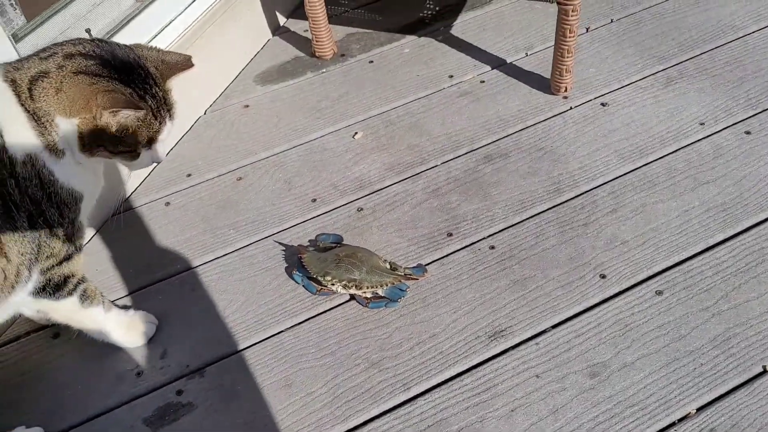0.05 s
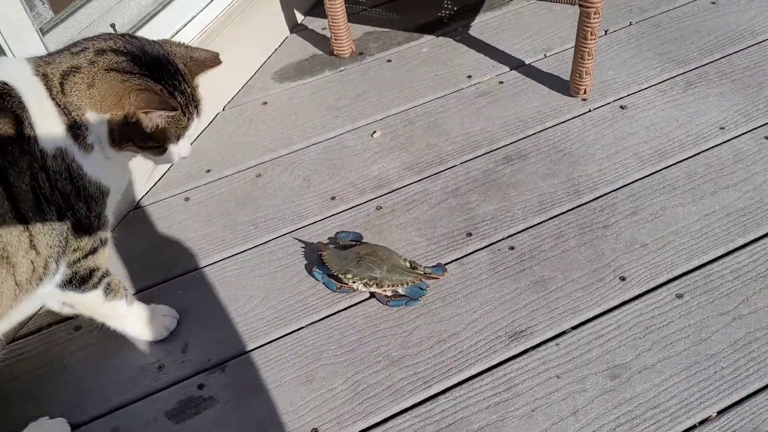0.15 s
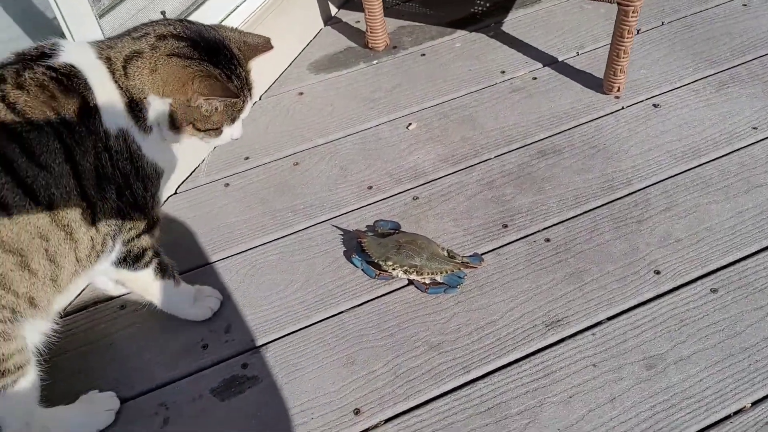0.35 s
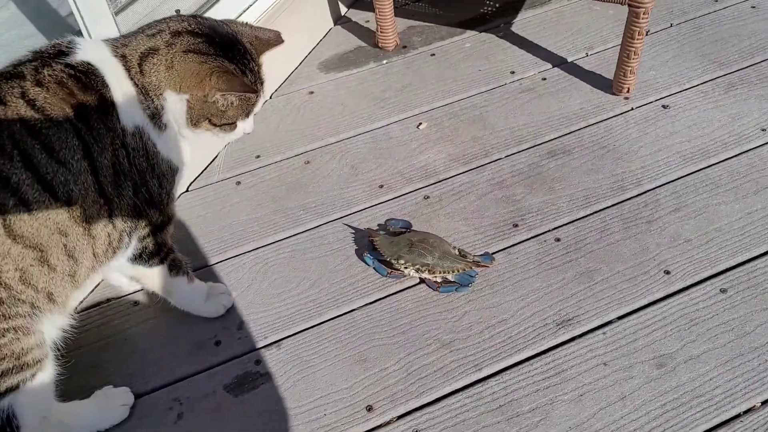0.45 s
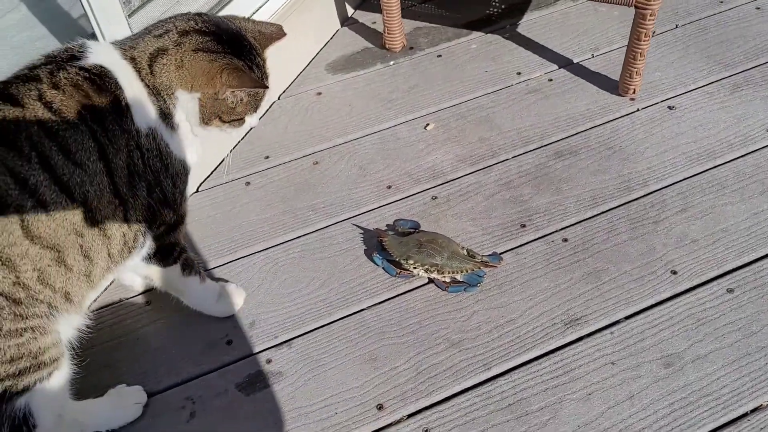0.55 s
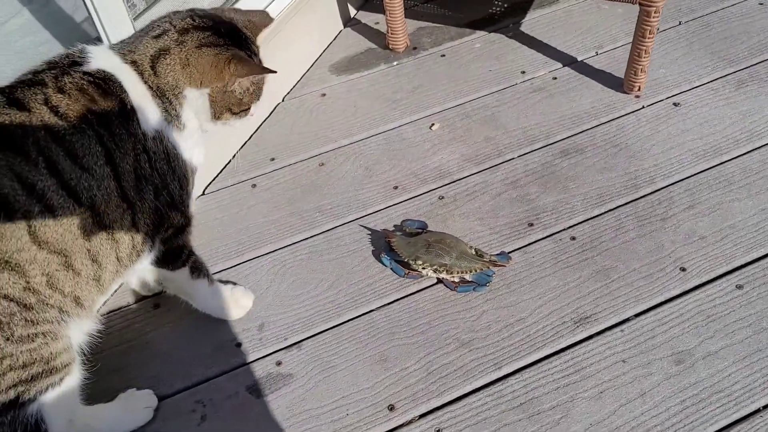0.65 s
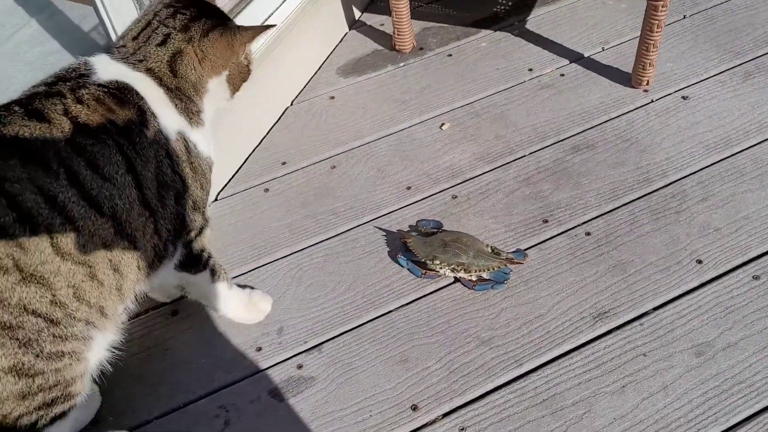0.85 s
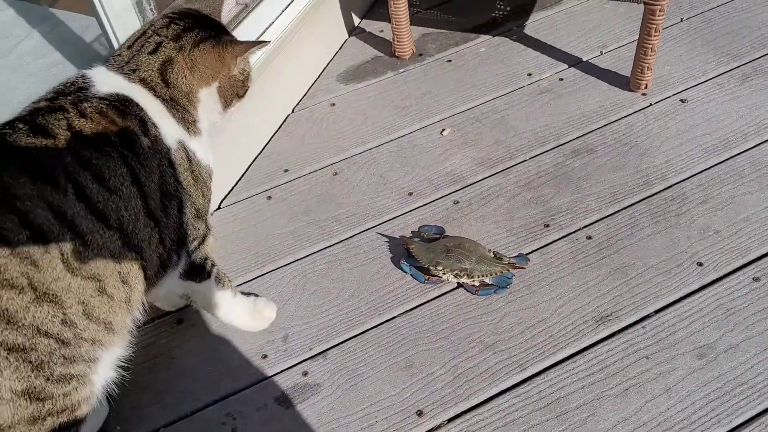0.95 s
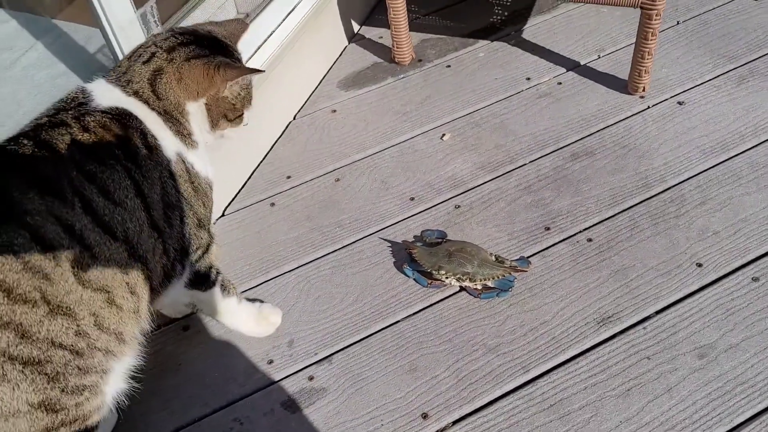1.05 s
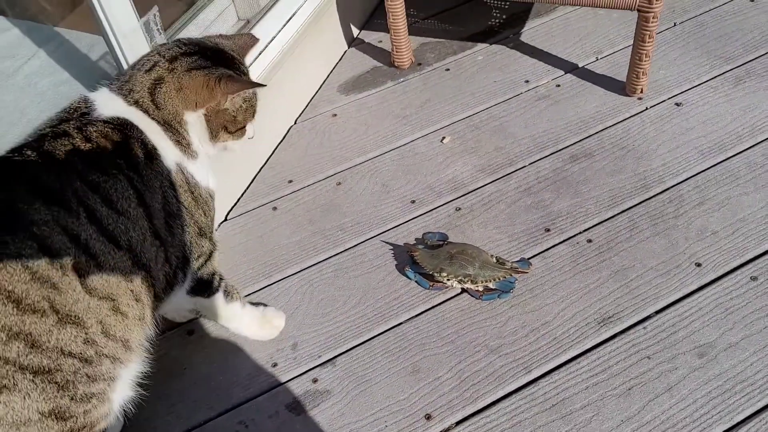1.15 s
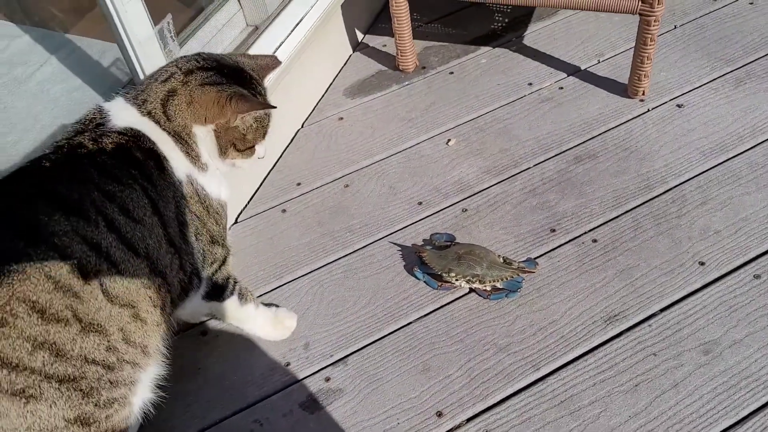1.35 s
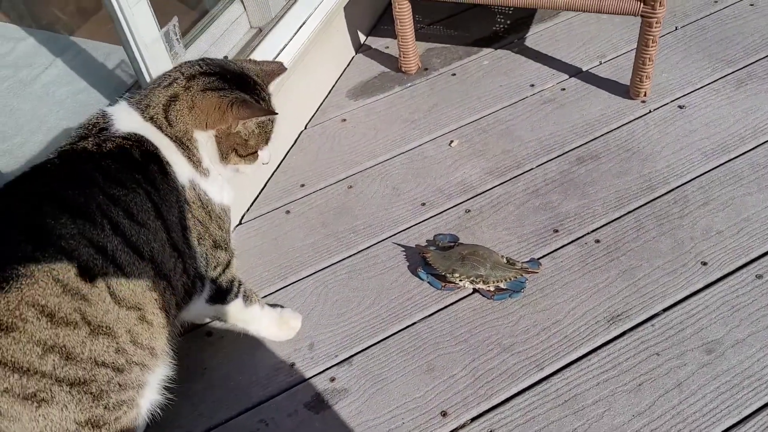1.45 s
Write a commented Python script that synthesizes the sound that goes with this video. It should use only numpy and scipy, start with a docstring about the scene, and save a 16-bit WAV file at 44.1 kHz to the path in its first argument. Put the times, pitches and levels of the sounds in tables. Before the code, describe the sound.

A sharp tap on a wooden deck, then a cat's faint steps and paw scuffs.

```python
"""One sharp tap knocks a board as a cat steps about on a wooden deck, close by.
A light scratch and a few soft taps follow. Each impact excites the damped modes of the board
and shakes the deck; sliding paws and catching claws make friction noise. A house wall
reflects each sound at once. Behind it lie a low outdoor rumble and a faint, even hiss."""
import sys
import numpy as np
from scipy import signal
from scipy.fft import rfft, irfft
from scipy.io import wavfile

SR = 44100
rng = np.random.default_rng(int(sys.argv[2]) if len(sys.argv) > 2 else 0)


def store_pcm(level_fs):
    """Save levels as 16-bit WAV."""
    pcm = np.round(np.clip(level_fs, -1, 1) * 32767).astype(np.int16)
    wavfile.write(sys.argv[1], SR, np.atleast_2d(pcm).T)


N = 66150
T = np.arange(N) / SR
FREQS = np.maximum(np.arange(N // 2 + 1) * SR / N, 1)

# Coherence of the scuffs and the outdoor noise. Each row: frequency in Hz, left-right correlation.
COHERENCE = [(60, 0.9), (300, 0.85), (650, 0.66), (1400, 0.014), (3000, 0.089), (14000, -0.11)]


def taps():
    """Impact excitation: each step knocks the board, rings the struck spot, clicks and shakes the deck."""
    # Each row: start in seconds, knock gain in dB, its cut-off in Hz, click gain in dB, its cut-off
    # in Hz, shudder gain in dB, frequency of the struck spot in Hz, its level in dB.
    steps = [(0.2186, 2, 2940, 2.5, 15800, 0, 1794, -42), (0.3751, -17.5, 417, -22.5, 14100, -14, 380, -53),
             (0.4355, -34, 500, -34, 4000, -19.5, 660, -50.5),
             (0.4718, -17, 644, -15, 3470, -10.5, 1110, -50), (0.655, -39, 350, -35, 3000, -23.5, 280, -65)]
    out = np.zeros((2, N))
    for start, knock_db, soft_hz, click_db, click_hz, shudder_db, spot_hz, spot_db in steps:
        age = T - start
        out += undb(knock_db) * board_knock(age, soft_hz)
        out += undb(spot_db) * mode(age, spot_hz, rise=0.003, t60=0.048)
        out += undb(click_db) * contact_click(age, click_hz)
        out += undb(shudder_db) * deck_shudder(age)
    return out


def board_knock(age, soft_hz):
    """Modal vibration: the board rings in its low modes; a softer contact passes less treble."""
    # Each row: frequency in Hz, level in dB, 60 dB decay time in seconds.
    low_modes = [(284.2, -43, .22), (327, -29.5, 0.042), (436.3, -44.5, 0.11), (472, -35, 0.057),
                 (617, -30.5, 0.042), (664, -32, 0.028), (745, -28.5, 0.04)]
    knock = sum(undb(db) * mode(age, hz, rise=0.00256, t60=t60) for hz, db, t60 in low_modes)
    knock = lowpass(knock, hz=836, order=6)
    knock = highpass(knock, hz=212, order=3)
    return lowpass(knock, soft_hz)


def contact_click(age, cutoff_hz):
    """Broadband excitation: a hard contact gives a burst of noise and wakes the board's high modes."""
    # Each row: frequency in Hz, level in dB, 60 dB decay time in seconds.
    high_modes = [(1195, -43.5, 0.029), (1384, -40, 0.0092), (1770, -38, 0.011), (2272, -47, 0.038),
                  (3440, -49.5, 0.043), (3780, -41, 0.019), (5150, -50.5, 0.013), (6600, -53, 0.022),
                  (8560, -46, 0.013), (9800, -47, 0.016), (11800, -58, 0.014)]
    # Each row: frequency in Hz, relative spectral density in dB.
    spectrum = [(500, 11.5), (1500, 8.5), (3000, -1), (4300, 4), (6000, -5.5), (9000, -7.5), (11000, -6.5),
                (12500, -11), (15000, -3.5)]
    ring = sum((-1) ** k * undb(db) * mode(age, hz, rise=0.003, t60=t60)
               for k, (hz, db, t60) in enumerate(high_modes))
    burst = undb(-36.5) * strike(age, rise=0.0025, t60=0.025) * noise(undb(curve(spectrum)), 0.15)
    return lowpass(ring + burst, cutoff_hz, order=1)


def deck_shudder(age):
    """Modal overlap: the deck's dense modes blur into noise, outlasted by a low drone of the joists."""
    # Each row: frequency in Hz, relative spectral density in dB.
    spectrum = [(100, -20.5), (200, -6), (270, 7.5), (470, 0), (750, -9.5), (950, -20.5), (2000, -35),
                (4000, -35.5), (12000, -44.5)]
    rise_s, correlation = 0.0045, 0.9676
    deck = undb(-36) * strike(age, rise_s, t60=0.16) * noise(undb(curve(spectrum)), correlation)
    joists = undb(-48) * strike(age, rise_s, t60=0.51) * noise(hump(hz=279, width_hz=77), correlation)
    return deck + joists


def scuffs():
    """Sliding friction: paws brush over the grain in gritty swells, and a claw catches now and then."""
    # Each row: start in seconds, length in seconds, relative level in dB.
    brushes = [(0.275, 0.095, -3), (0.394, 0.085, -7.5), (0.617, 0.061, -8), (0.879, 0.12, -11)]
    # Each row: start in seconds, relative level in dB.
    scratches = [(0.3088, 7.5), (0.317, 7), (0.3295, -7), (0.449, -9)]
    # Each row: frequency in Hz, relative spectral density in dB.
    spectrum = [(200, 9.5), (650, 13), (1000, -3), (1600, 2), (3400, -1.5), (5000, -7), (9000, -12.5),
                (15000, -20)]
    swell = sum(undb(db - 57.5) * np.sin(np.pi * np.clip((T - start) / length, 0, 1))
                for start, length, db in brushes)
    catch = sum(undb(db - 63) * strike(T - start, rise=0.0013, t60=0.022) for start, db in scratches)
    grain_db, grain_samples = 4.5, 50
    grains = rng.standard_normal(N // grain_samples + 1)
    grit = undb(grain_db * np.repeat(grains, grain_samples)[:N])
    grit /= np.sqrt(np.mean(grit ** 2))
    return (swell + catch) * grit * noise(undb(curve(spectrum)), curve(COHERENCE))


def wall_echo(direct):
    """Early reflection: the house wall returns a duller, weaker copy, too soon to be heard apart."""
    delay_s = 0.0068
    dulled = lowpass(direct, hz=1400, order=1)
    return undb(-11.5) * np.array([np.interp(T - delay_s, T, side, left=0) for side in dulled])


def outdoors():
    """Ambient noise, coherent only at low frequencies: a distant, wavering hiss over a narrow rumble."""
    # Each row: frequency in Hz, relative spectral density in dB.
    spectrum = [(20, -11), (45, -4), (75, -2), (115, -10), (200, -17.5), (330, -18.5), (480, -21),
                (750, -19), (1100, -25.5), (2000, -30), (3700, -33), (5000, -37.5), (7000, -38),
                (9500, -44), (13000, -43.5)]
    waver_db = 0.3 * np.interp(T, np.linspace(0, T[-1], 12), rng.standard_normal(12))
    hiss = undb(-59.5 + waver_db) * noise(undb(curve(spectrum)), curve(COHERENCE))
    rumble = undb(-69) * noise(hump(hz=72.6, width_hz=20), curve(COHERENCE))
    return hiss + rumble


def undb(db):
    """Decibels to amplitude gain."""
    return 10 ** (np.asarray(db) / 20)


def curve(points):
    """Interpolation of (Hz, value) points on a log-frequency axis."""
    hz, value = np.array(points).T
    return np.interp(np.log(FREQS), np.log(hz), value)


def hump(hz, width_hz):
    """Bell-shaped gain of one resonance, halved at width_hz to either side."""
    return 1 / (1 + ((FREQS - hz) / width_hz) ** 2)


def noise(gain, correlation):
    """Mid-side mixing: stereo noise of rms 1 with the given spectrum and left-right correlation."""
    mid, side = rfft(rng.standard_normal((2, N)))
    c = np.clip(correlation, -1, 1)
    stereo = np.sqrt(1 + c) * mid + np.sqrt(1 - c) * side * np.array([[1], [-1]])
    y = irfft(gain * stereo, N)
    return y / y.std()


def strike(age, rise, t60):
    """Exponential decay: the envelope swells for rise seconds, then falls 60 dB in t60 seconds."""
    return np.clip(age / rise, 0, 1) ** 2 * np.exp(-np.log(1000) * np.maximum(age - rise, 0) / t60)


def mode(age, hz, rise, t60):
    """Damped oscillation of one struck resonance."""
    return strike(age, rise, t60) * np.sin(2 * np.pi * hz * (age - rise))


def lowpass(x, hz, order=2):
    """Butterworth low-pass."""
    return signal.sosfilt(signal.butter(order, min(hz, .45 * SR), fs=SR, output="sos"), x)


def highpass(x, hz, order=2):
    """Butterworth high-pass."""
    return signal.sosfilt(signal.butter(order, hz, "high", fs=SR, output="sos"), x)


def balance(x, points):
    """Level difference: tilts left against right by a (Hz, dB) curve."""
    return irfft(rfft(x) * undb(np.array([[1], [-1]]) * curve(points) / 2), N)


def lag(x, seconds):
    """Arrival-time difference: sound reaches the right microphone port a little after the left."""
    right = irfft(rfft(x[1]) * np.exp(-2j * np.pi * FREQS * seconds), N)
    return np.array([x[0], right])


def scene():
    """Superposition of the direct sound from the deck, its reflection and the open air."""
    # Colour due to the deck's direction. Each row: frequency in Hz, left minus right in dB.
    deck_direction = [(700, 0.5), (1200, 0), (2400, -4.5), (3500, -10), (4800, 1.5), (6500, -1), (9500, 1),
                      (13000, -9)]
    direct = lag(balance(taps() + scuffs(), deck_direction), seconds=0.00016)
    return direct + wall_echo(direct) + lag(outdoors(), seconds=0.000268)


def record(dry):
    """Frequency response: the two microphone ports differ in colour, and a steep low-pass cuts the top."""
    # Each row: frequency in Hz, left minus right in dB.
    port_colour = [(300, -0.5), (700, -1), (1100, -1.5), (1650, -7), (2400, -3), (3400, -2.5), (6500, -1),
                   (9500, 4.5), (13000, 7)]
    top_hz = 14500
    band_limit = signal.ellip(8, .2, 60, top_hz, fs=SR, output="sos")
    return signal.sosfilt(band_limit, balance(dry, port_colour))


dry = scene()
out = record(dry)
store_pcm(out)
```